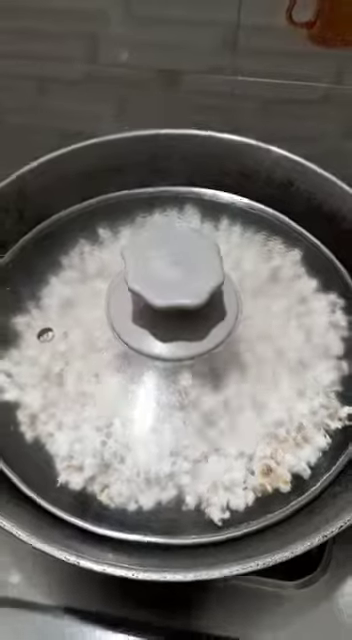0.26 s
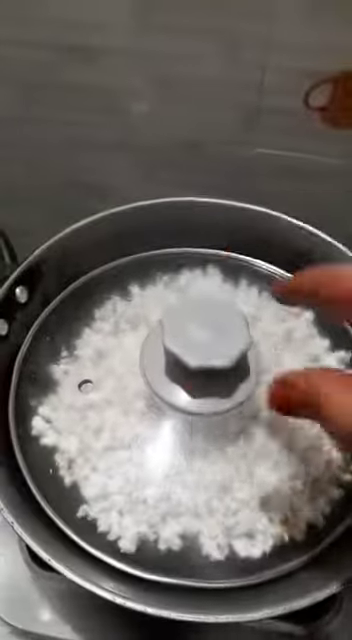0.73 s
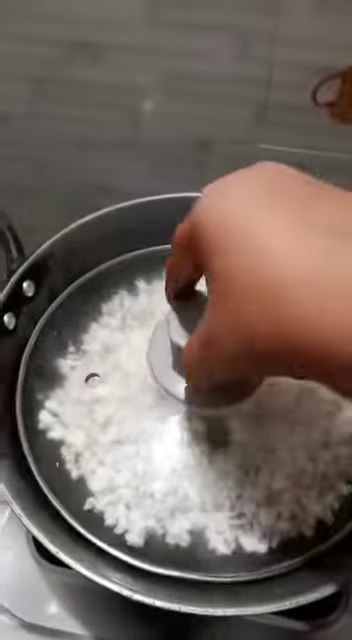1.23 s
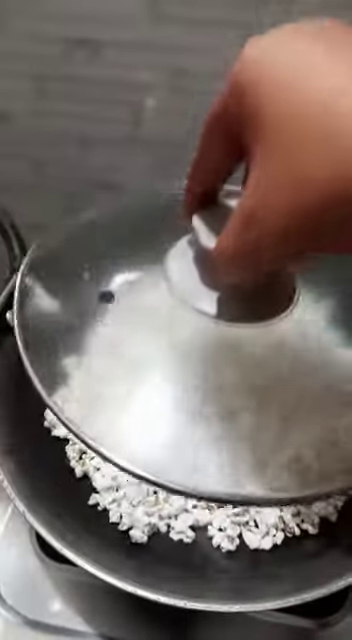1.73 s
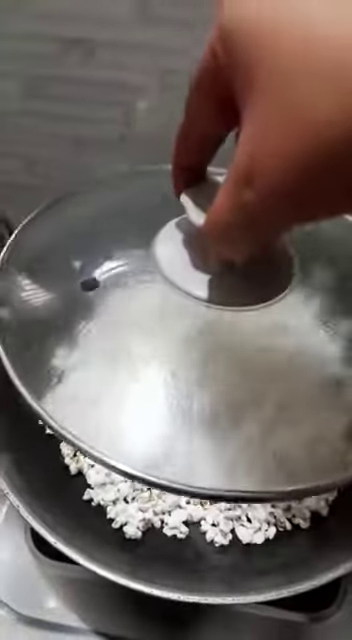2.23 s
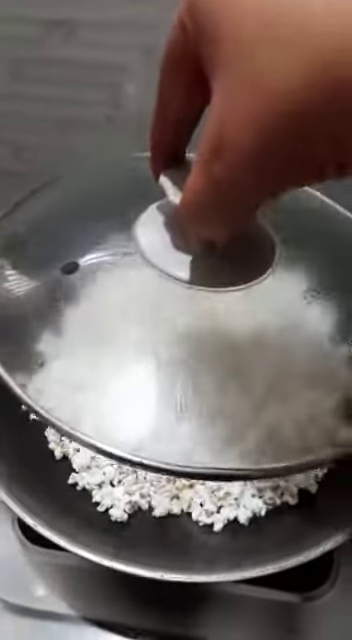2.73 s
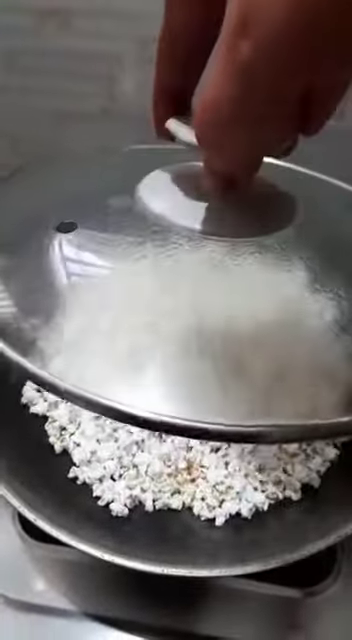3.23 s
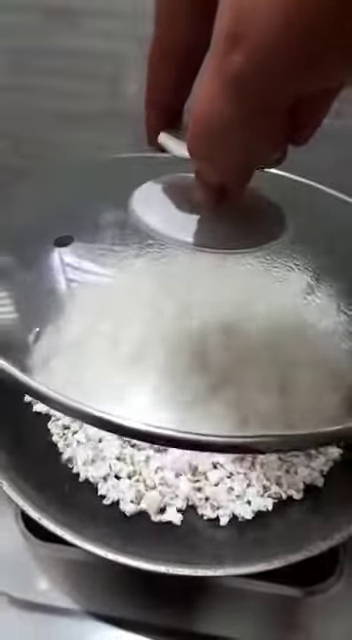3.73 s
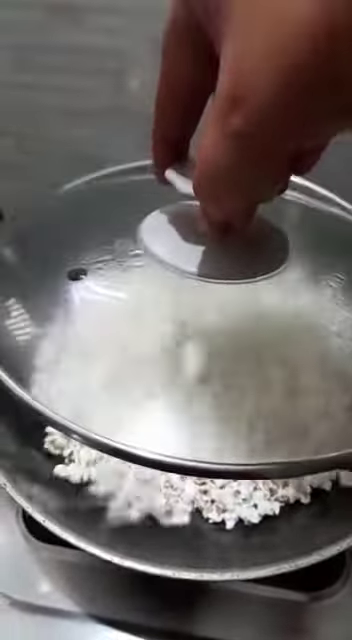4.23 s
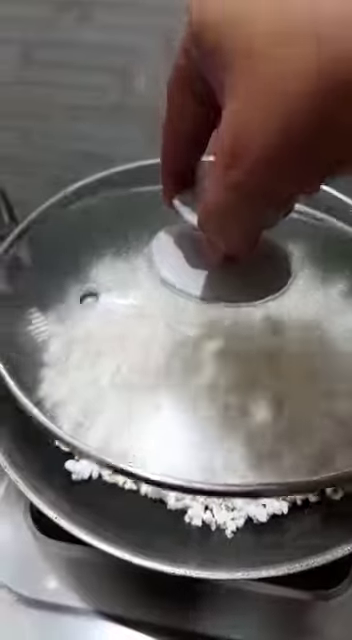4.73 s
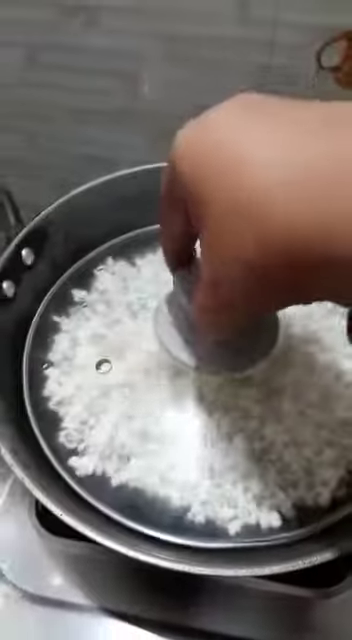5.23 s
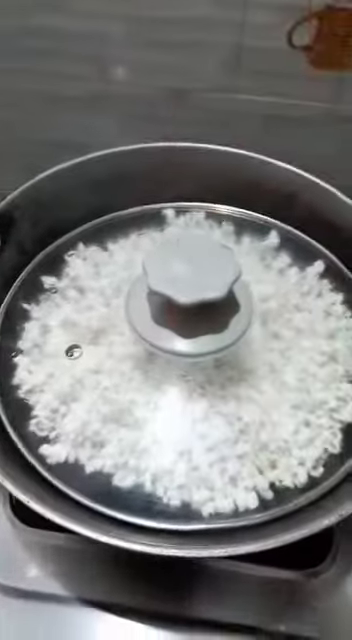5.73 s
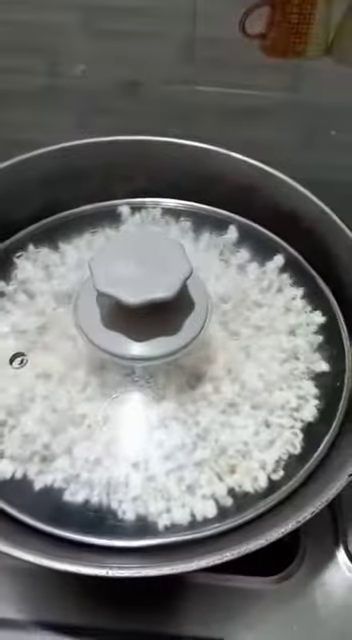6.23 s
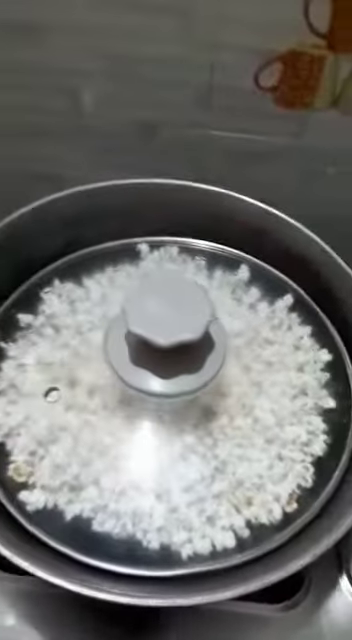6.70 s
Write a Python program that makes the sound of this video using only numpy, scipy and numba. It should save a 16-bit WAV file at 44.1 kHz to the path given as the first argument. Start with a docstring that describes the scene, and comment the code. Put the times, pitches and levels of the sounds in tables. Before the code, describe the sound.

Handheld stereo microphone just above the pan: a quick flurry of boxy pops under glass, then scattered ones. As the lid lifts, cracks become brighter and snappier, crowding into clusters with tiny rattles of shifting kernels. The lid drops back with a short metallic clunk, muffling the last, weaker and more widely spaced pops. Short hard-walled kitchen reverberation, faint hum and hiss beneath.

```python
"""Popcorn under a glass lid

Popcorn bursts in a metal pan on a stove, heard by a phone just above it; the glass lid is tipped open and shut again.
Each pop cracks as a noise burst, thumps the pan (struck modes) and knocks the lid (short tones).
Rubbing grains follow each pop, one kernel vents steam as gritty noise, and dry rustles are noise swells.
A small tiled kitchen answers with decaying noise, over a quiet hum and hiss.
The phone's two ports colour the treble differently."""
import sys
import numpy as np
from scipy import signal
from scipy.fft import rfft, irfft
from scipy.io import wavfile
from scipy.ndimage import uniform_filter1d
from numba import njit

SR = 44100
rng = np.random.default_rng(int(sys.argv[2]) if len(sys.argv) > 2 else 0)


def master(y):
    """Save y as 16-bit WAV."""
    cut = np.clip(np.atleast_2d(y).T, -1, 1)
    pcm = np.round(cut * 32767)  # scale
    wavfile.write(sys.argv[1], SR, pcm.astype(np.int16))


N = 306936

# Pops, with a few handling knocks as the lid is set down; a kernel cushioned inside the heap hardly thumps the pan.
# Each row: start in seconds, crack level in dB, thump level in dB.
POPS = [(0.0276, -36.5, -44.5), (0.0765, -34.5, -41), (0.1271, -18.5, -29.5), (0.164, -22, -48),
        (0.174, -20, -41), (0.2175, -20, -30), (0.2459, -35, -27), (0.268, -20.5, -32.5), (0.276, -18, -55),
        (0.3115, -25.5, -66), (0.404, -27.5, -82), (0.4259, -26.5, -32), (0.4577, -28, -77),
        (0.4758, -20.5, -34), (0.5438, -23.5, -63), (0.577, -27, -32.5), (0.7049, -19, -49),
        (0.8585, -25, -34), (0.8834, -15, -23), (0.951, -25.5, -28), (1.1068, -25.5, -34.5),
        (1.1506, -22, -43), (1.297, -32, -33.5), (1.309, -23, -51), (1.5203, -23, -43),
        (1.5366, -15, -39.5), (1.6901, -22.5, -43.5), (1.7675, -19, -37), (1.962, -34, -54),
        (1.993, -13, -41), (2.1079, -22, -36), (2.14, -13, -40.5), (2.1941, -22, -47), (2.2154, -12, -31.5),
        (2.2323, -13, -33.5), (2.2919, -18, -43), (2.417, -26, -45), (2.4869, -11.5, -26.5),
        (2.7266, -29.5, -58), (2.898, -15.5, -31), (2.955, -20.5, -38.5), (3.1091, -18, -45),
        (3.1355, -8.5, -31.5), (3.2663, -27, -47), (3.3357, -24, -55), (3.3622, -14.5, -26),
        (3.395, -19, -43), (3.4099, -20.5, -42), (3.4133, -14.5, -42), (3.4742, -21.5, -35),
        (3.5745, -20, -32), (3.5949, -22, -50), (3.645, -21.5, -69), (3.7065, -24.5, -35),
        (3.765, -24.5, -32), (3.8025, -23, -52), (3.8288, -25.5, -54), (3.8965, -32, -71),
        (3.934, -15, -52.5), (3.9384, -15.5, -32), (4.0165, -20, -32.5), (4.03, -11, -44),
        (4.1226, -39, -59), (4.1792, -27, -50), (4.212, -22, -39.5), (4.319, -23, -29.5),
        (4.3233, -11, -36), (4.369, -19, -29), (4.418, -22, -43), (4.57, -26, -50), (4.6009, -12.5, -33),
        (4.7854, -18, -31), (4.9248, -33.5, -57), (4.9558, -15.5, -33), (5.0223, -24, -36),
        (5.089, -9.5, -24.5), (5.107, -18, -46), (5.269, -37.5, -47), (5.2988, -35.5, -31.5),
        (5.329, -21, -46), (5.3787, -23.5, -53), (5.715, -36, -75), (5.7498, -31.5, -45),
        (5.8939, -33.5, -48.5), (6.0109, -20.5, -25.5), (6.0784, -24, -38), (6.129, -28.5, -33),
        (6.2615, -32.5, -43.5), (6.458, -30.5, -41.5), (6.5087, -33, -58), (6.5952, -47.5, -49.5),
        (6.756, -18.5, -29.5), (6.873, -33.5, -52)]
# Added short knocks and upper pan ring, some nearly without knock.
# Each row: start in seconds, knock level in dB, knock pitch in Hz, level on the upper pan modes in dB.
ADDED_KNOCKS = [(0.5774, -31.5, 1510, -41.5), (1.0341, -42, 3050, -55), (1.2155, -41, 1000, -60),
                (1.993, -26.5, 2060, -59), (2.2913, -23.5, 1320, -32.5), (3.1085, -35.5, 1304, -31),
                (3.1353, -17.5, 1526, -66), (3.5744, -21.5, 1690, -32), (4.2126, -22.5, 1440, -29.5),
                (4.319, -56, 1480, -30.5), (4.369, -52, 1610, -35.5), (4.4181, -27.5, 1370, -36.5),
                (4.6003, -23, 2080, -39), (4.7854, -31.5, 1450, -29.5), (6.756, -27.5, 1340, -45.5)]
# The lid's rim comes down on the pan and bounces. Each row: start in seconds, level in dB.
RIM_CLUNKS = [(5.0225, -34), (5.0895, -23), (5.1477, -32.5)]
# Modes of the pan bottom and the air under the lid. Each row: nominal pitch in Hz, relative level in dB, T60 in seconds.
PAN_MODES = [(85.3, -22, 0.7), (154.2, -6, 0.2), (200.4, -11, 0.23), (275.8, -10.5, 0.1),
             (346.4, -5.5, 0.068), (452.6, -6.5, 0.061), (637.5, -0.5, 0.032), (718.6, -5, 0.047)]
# Glass modes in every crack while the lid is shut. Each row: pitch in Hz, relative level in dB, T60 in seconds.
LID_MODES = [(5360, -24, 0.04), (2940, -4.5, 0.011)]
# Long modes of the lid once seated anew. Each row: nominal pitch in Hz, level against the thump in dB.
LID_RING_MODES = [(2715, -27), (3050, -30)]
# Dry rustles, the first two by the right port.
# Each row: start in seconds, length in seconds, pitch in Hz, level in dB, left minus right in dB.
RUSTLES = [(0.133, 0.014, 4500, -36.5, -32), (0.175, 0.0048, 3060, -35, -14),
           (2.68, 0.037, 1030, -44, -4.5)]
# Steam spectrum. Each row: frequency in Hz, relative level in dB.
STEAM_SPECTRUM = [(4000, -7), (8000, -4), (13000, 11), (16000, 4.5)]
# Port colours. Each row: frequency in Hz, gain in dB.
LEFT_PORT = [(30, -16), (70, 4), (800, 9.5), (1100, 1.5), (1700, 2.5), (5000, 7), (8100, 13.5),
             (9400, -10.5), (10700, -14.5), (11800, -7.5), (15500, -13)]
RIGHT_PORT = [(30, -13.5), (70, 4.5), (800, 10.5), (1100, -0.5), (2400, 7), (4300, 7.5), (6300, -6.5),
              (8200, -20), (10300, -16.5), (12500, -4.5), (15200, -12)]
# Kitchen decay. Each row: frequency in Hz, T60 in seconds.
ROOM_T60 = [(100, 0.35), (16000, 0.36)]
# Spectrum of the kitchen hum and hiss. Each row: frequency in Hz, relative density in dB.
FLOOR_SPECTRUM = [(40, 11), (100, 6), (320, 3), (800, -10.5), (3000, -11), (16000, -15)]

# Lid timing: tipped open in seconds, shut in seconds.
LID_OPEN_S = (1.45, 5.06)
LET_GO_S = 5.55  # the hand leaves the knob

# Settings by lid state: shut, tipped open, seated anew.
# Mean knock pitch in Hz.
KNOCK_HZ = (1493, 1650, 1350)
# Spread of the knock pitch as a share.
KNOCK_SPREAD = (0.026, 0.14, 0.035)
# Knock decay time constant in seconds.
KNOCK_FADE_S = (0.0081, 0.0025, 0.0083)
# Mean knock level against the crack in dB.
KNOCK_DB = (-22, -17, -17.5)
# Mean drive offset of the upper pan modes in dB.
UPPER_DB = (-11, -11.5, -13.5)
# Mean level of the crack's top band against the crack in dB.
TREBLE_DB = (-1, 4.5, -0.5)

KNOCK_SCATTER_DB, UPPER_SCATTER_DB, TREBLE_SCATTER_DB = 1.5, 2, 1.5
FOLLOW = 0.52  # share of the crack's lead over the thump that reaches the upper modes
ADDED_FADE_S = 0.0035  # decay time constant of the added knocks
HARD_DB = 31.5  # glass drives the upper pan modes more than the lower
PAN_SHIFT, LID_SHIFT = 0.041, 0.0118  # share by which the shifting heap retunes the modes at each blow
BOUNCE_DB, BOUNCE_SPREAD_DB = -8.5, 12.5  # loudest bounce against its pop, range below that
BOUNCE_MIN_S, BOUNCE_MEAN_S = 0.012, 0.037  # least delay, mean extra delay
SETTLE_DB_PER_S = -120  # later grains are fainter
STEAM_S, STEAM_DB, STEAM_HOLD_S, STEAM_FADE_S = 3.413, -28.5, 0.035, 0.033
TOP_HZ = 16250


def all_pops():
    """Every row of POPS, then a faint random bounce after each."""
    pops = np.array(POPS)
    u = rng.random((len(pops), 2))
    drop_db = BOUNCE_DB - BOUNCE_SPREAD_DB * u[:, 1]
    bounces = pops + np.outer(drop_db, [0, 1, 1])
    bounces[:, 0] += BOUNCE_MIN_S - BOUNCE_MEAN_S * np.log(u[:, 0])
    bounces = bounces[bounces[:, 0] < N / SR]
    return np.vstack([pops, bounces]).T


def cracks(s, db, top_db, is_open):
    """A short soft rise leads into a sharp noise burst that scatters inside the pan; each port hears another path."""
    t = np.arange(int(.04 * SR)) / SR - .003
    rise = undb(-24.5) * np.exp(t / 0.0038)
    scatter = np.exp(-t / 0.00027) + undb(-8.5) * np.exp(-t / 0.0071)
    fade = np.where(t < 0, rise, scatter)
    shared = rng.standard_normal((len(s), len(t)))
    spot_db = 4 * rng.standard_normal((len(LID_MODES), len(s)))  # each burst meets the glass elsewhere
    shared[:, np.searchsorted(t, 0)] = 1.96  # the burst itself: one sharp pressure spike
    start_s = s + t[0]
    ports = []
    for _ in range(2):
        burst = fade * (0.21 * shared + 0.94 * rng.standard_normal(shared.shape))
        under_lid = place(start_s, undb(db) * ~is_open, burst)
        free = place(start_s, undb(db) * is_open, burst)
        glass = 0
        for (hz, mode_db, t60), scatter_db in zip(LID_MODES, spot_db):
            gains = undb(db + mode_db + scatter_db - 30.5) * ~is_open
            glass = glass + ring(place(start_s, gains, burst), hz, t60)
        low = band(free, 975, 6970) + band(undb(-4.0) * under_lid + glass, 2620, 6800)
        top = band(place(start_s, undb(db + top_db), burst), 9500, 18000)
        ports.append(low + top)
    return np.array(ports)


def thumps(s, db, hard_db, is_open):
    """A half-sine push and a short rumble of the heap drive the pan; each blow lands on a new spot."""
    t = np.arange(int(.15 * SR)) / SR
    push = np.sin(np.pi * np.minimum(t / 0.0013, 1))
    lumps = undb(40.5 * uniform_filter1d(rng.standard_normal((len(s), len(t))), size=150))
    rumble = undb(-36) * np.exp(-t / 0.035) * lumps * rng.standard_normal((len(s), len(t)))
    shapes = push / push.sum() + rumble
    spot = rng.standard_normal((len(s), len(PAN_MODES), 2))
    out = 0
    for k, (hz, mode_db, t60) in enumerate(PAN_MODES):
        upper = np.clip(np.log2(hz / 185), 0, 1)  # a harder blow favours the upper modes
        # the shut lid holds the highest in, its air swells the middle
        lid_db = np.where(hz > 550, -16, 4 * (hz > 240)) * ~is_open
        blow_db = db + mode_db + upper * hard_db + lid_db + 1.72 * spot[:, k, 0]
        drive = place(s, undb(blow_db), shapes)
        mode = retuned(drive, s, hz * (1 + PAN_SHIFT * spot[:, k, 1]), t60)
        # modes reach the ports at different times, more so the higher ones
        lag_samples = int(hz / 60) * (-1) ** k + 4
        out = out - np.array([np.roll(mode, lag_samples), mode])
    return out


def hard_blows(s, db):
    """Blows passed from the glass to the pan's wall, strongest in the upper modes."""
    is_open = np.searchsorted(LID_OPEN_S, s) == 1
    return thumps(s, db - HARD_DB, HARD_DB + 0 * s, is_open)


def knocks(s, db, hz, fade_s):
    """A short hollow ring of the lid, at a slightly different phase at each port."""
    t = np.arange(int(.1 * SR)) / SR
    u = rng.standard_normal((len(s), 2))
    wobble = np.cumsum(0.024 * rng.standard_normal((len(s), len(t))), axis=1)
    envelope = np.exp(-t / fade_s[:, None]) * (1 - np.exp(-t / 0.00037))
    phase = 2 * np.pi * hz[:, None] * t + wobble
    return np.array([place(s, undb(db), envelope * np.sin(phase + 0.98 * u[:, [k]])) for k in (0, 1)])


def lid_ring(s, db):
    """Thumps set the freely seated glass shimmering faintly."""
    drive = place(s, undb(db) * (s > LET_GO_S), np.ones((len(s), 1)))
    shift = LID_SHIFT * rng.standard_normal((len(s), len(LID_RING_MODES)))
    return sum(undb(mode_db) * retuned(drive, s, hz * (1 + d), 0.43)
               for (hz, mode_db), d in zip(LID_RING_MODES, shift.T))


def settling(s, db):
    """After a pop the heap shifts: short rough grains as kernels rub and tap the glass."""
    t = np.arange(int(0.0327 * SR)) / SR
    u = rng.random((len(s), 12, 4))
    late_s = -0.045 * np.log(u[..., 0])
    when_s = np.minimum(s[:, None] + late_s, N / SR).ravel()
    gains = undb(db[:, None] - 7.5 - 11.5 * u[..., 1] + SETTLE_DB_PER_S * late_s).ravel()
    hz = (1500 * 4.2 ** u[..., 2]).reshape(-1, 1)
    wobble = np.cumsum(0.14 * rng.standard_normal((len(hz), len(t))), axis=1)
    grains = t / 0.0032 * np.exp(-t / 0.0019) * np.sin(2 * np.pi * hz * t + wobble)
    left_share = u[..., 3].ravel()
    return np.array([place(when_s, gains * share, grains) for share in (left_share, 1 - left_share)])


def steam():
    """A gritty hiss that spits out with the burst, holds and fades."""
    t = np.arange(N) / SR - STEAM_S
    hold_fade = np.exp(-np.maximum(t - STEAM_HOLD_S, 0) / STEAM_FADE_S)
    spit = 1 + 6 * np.exp(-np.abs(t) / 0.0016)
    shape = (t > 0) * hold_fade * spit
    grit = undb(7.9 * uniform_filter1d(rng.standard_normal(N), size=40))
    hiss = np.array([colour(noise, STEAM_SPECTRUM) for noise in rng.standard_normal((2, N))])
    return undb(STEAM_DB) * shape * grit * hiss


def rustle():
    """Soft-edged, gritty swells of band-limited noise."""
    t, out = np.arange(N) / SR, 0
    for s, length_s, hz, db, pan_db in RUSTLES:
        grit = undb(34.6 * uniform_filter1d(rng.standard_normal(N), size=40))
        noise = band(grit * rng.standard_normal((2, N)), hz / 1.28, hz * 1.67)
        gains = undb(db + pan_db * np.array([[.5], [-.5]]))
        out = out + gains * np.exp(-((t - s) / length_s) ** 4) * noise
    return out


def kitchen(x, wet_db):
    """Decaying noise per octave as the answer of the room, unrelated at the two ports."""
    t = np.arange(int(.7 * SR)) / SR
    wet = []
    for side in x:
        tail = 0
        for hz in 125 * 2. ** np.arange(8):
            octave = band(rng.standard_normal(len(t)), hz / np.sqrt(2), hz * np.sqrt(2))
            tail = tail + octave * 1000 ** (-t / on_log(hz, ROOM_T60))
        tail *= 1 - np.exp(-t / 0.0073)  # reflections build up
        tail *= undb(33 * uniform_filter1d(rng.standard_normal(len(t)), size=60))  # and arrive in clumps
        unit_tail = tail / np.sqrt(np.sum(tail ** 2))
        wet.append(signal.fftconvolve(side, unit_tail)[:N])
    return x + undb(wet_db) * np.array(wet)


def floor():
    """Quiet hum and hiss of the kitchen: coloured noise, partly shared by the ports."""
    mid, side = (colour(rng.standard_normal(N), FLOOR_SPECTRUM) for _ in range(2))
    return undb(-58.0) * (mid + 0.51 * side * np.array([[1], [-1]]))


def undb(db):
    """Amplitude ratio of a level in dB."""
    return 10 ** (np.asarray(db) / 20)


def on_log(hz, table):
    """Read a (Hz, value) table on a log-frequency axis."""
    f, v = np.transpose(table)
    return np.interp(np.log(np.maximum(hz, 1)), np.log(f), v)


def colour(x, table):
    """Causal filter with the gains of a (Hz, dB) table, from the folded cepstrum."""
    size = 4096
    gains = undb(on_log(np.fft.rfftfreq(size, 1 / SR), table))
    cepstrum = irfft(np.log(gains))
    cepstrum[1:size // 2] *= 2
    cepstrum[size // 2 + 1:] = 0
    impulse = irfft(np.exp(rfft(cepstrum)))[:size // 2]
    return signal.fftconvolve(x, impulse)[:N]


def band(x, lo_hz, hi_hz):
    """Butterworth band-pass."""
    edges_hz = [lo_hz, min(hi_hz, .45 * SR)]
    return signal.sosfilt(signal.butter(2, edges_hz, "bandpass", fs=SR, output="sos"), x)


def mode_pole(hz, t60):
    """Complex pole of a mode: its turn and decay per sample."""
    return np.exp(2j * np.pi * hz / SR - np.log(1000) / (t60 * SR))


def ring(x, hz, t60):
    """One mode driven by x; a unit impulse gives a decaying sine of unit initial amplitude."""
    return signal.lfilter([1], [1, -mode_pole(hz, t60)], x).imag


@njit
def ring_moving(x, pole):
    """One mode whose pole may change at every sample."""
    out, z = np.empty(len(x)), 0j
    for i in range(len(x)):
        z = z * pole[i] + x[i] + 1e-18  # keeps clear of denormals
        out[i] = z.imag
    return out


def retuned(x, s, hz, t60):
    """A mode that takes pitch hz[j] from blow s[j] until the next blow."""
    order = np.argsort(s)
    last = np.maximum(np.searchsorted(s[order], np.arange(N) / SR) - 1, 0)
    return ring_moving(x, mode_pole(hz[order], t60)[last])


def place(s, gains, shapes):
    """Lay one shape per event on the time line."""
    out = np.zeros(N + shapes.shape[1])
    for t, g, shape in zip(s, gains, shapes):
        i = int(t * SR)
        out[i:i + len(shape)] += g * shape
    return out[:N]


def scene():
    """Pops, added knocks and steam in the kitchen, with rustles and floor added dry."""
    s, crack_db, thump_db = all_pops()
    state = np.searchsorted(LID_OPEN_S, s)  # 0 shut, 1 tipped open, 2 seated anew
    is_open = state == 1
    u = rng.standard_normal((len(s), 4))
    knock_db = crack_db + np.array(KNOCK_DB)[state] + KNOCK_SCATTER_DB * u[:, 0]
    knock_hz = np.array(KNOCK_HZ)[state] * (1 + np.array(KNOCK_SPREAD)[state] * u[:, 3])
    knock_fade_s = np.array(KNOCK_FADE_S)[state]
    hard_db = FOLLOW * (crack_db - thump_db) + np.array(UPPER_DB)[state] + UPPER_SCATTER_DB * u[:, 1]
    top_db = np.array(TREBLE_DB)[state] + TREBLE_SCATTER_DB * u[:, 2]
    added_s, added_db, added_hz, added_pan_db = np.transpose(ADDED_KNOCKS)
    clunk_s, clunk_db = np.transpose(RIM_CLUNKS)

    bright = cracks(s, crack_db, top_db, is_open)
    hollow = knocks(s, knock_db, knock_hz, knock_fade_s)
    hollow = hollow + knocks(added_s, added_db, added_hz, ADDED_FADE_S + 0 * added_s)
    bright = bright + settling(s, crack_db) + lid_ring(s, thump_db) + steam()
    dull = thumps(s, thump_db, hard_db, is_open)
    dull = dull + hard_blows(added_s, added_pan_db) + hard_blows(clunk_s, clunk_db)
    dull = kitchen(dull + hollow, wet_db=-12)
    return kitchen(bright, wet_db=-7) + dull + rustle() + floor()


def record(dry):
    """Each port has its own colour; peaks clip and the top is cut."""
    ports = np.array([colour(dry[0], LEFT_PORT), colour(dry[1], RIGHT_PORT)])
    top_cut = signal.ellip(10, .2, 70, TOP_HZ, fs=SR, output="sos")
    return signal.sosfilt(top_cut, np.clip(ports, -1, 1))


dry = scene()
out = record(dry)
master(out)
```